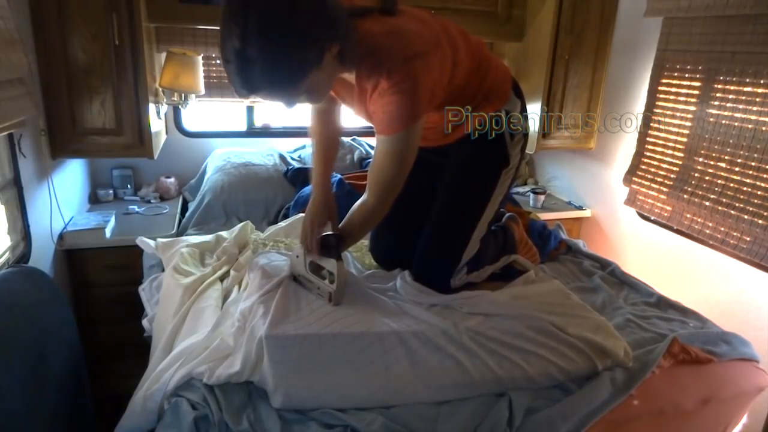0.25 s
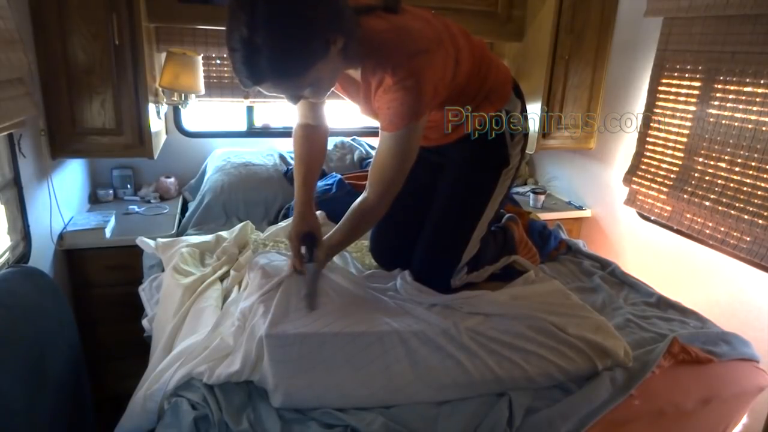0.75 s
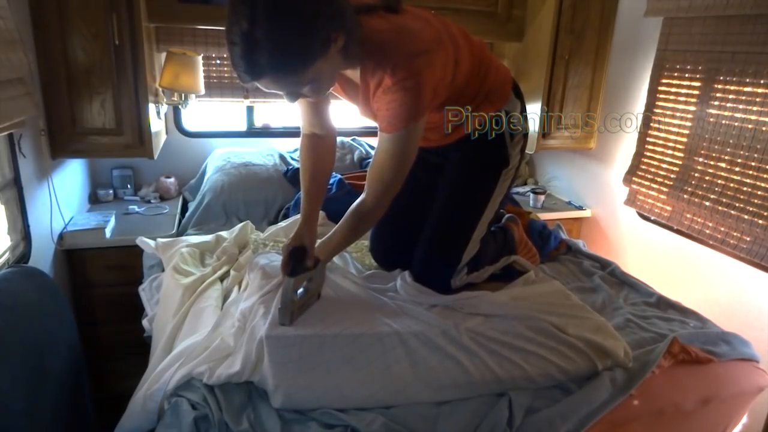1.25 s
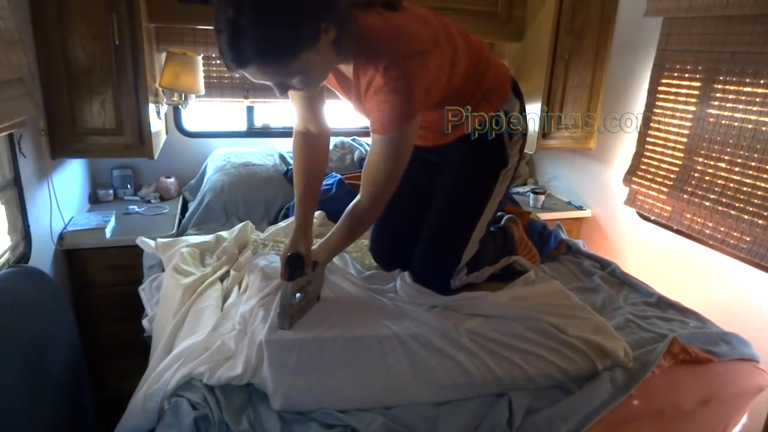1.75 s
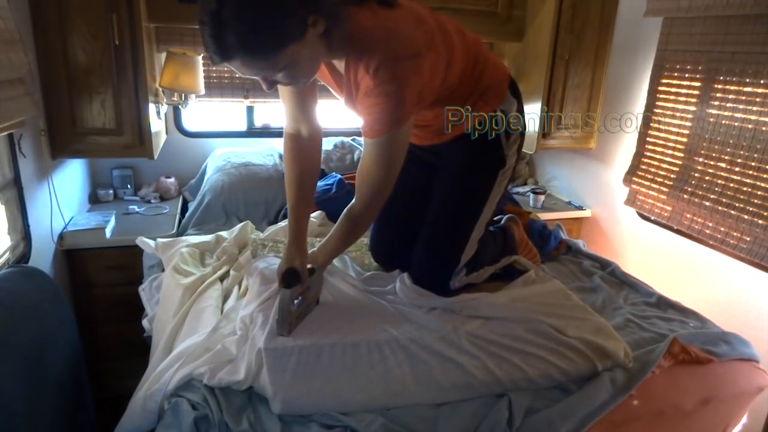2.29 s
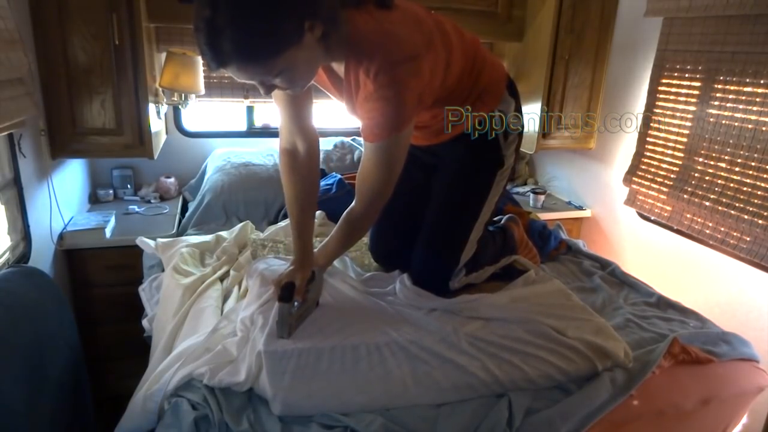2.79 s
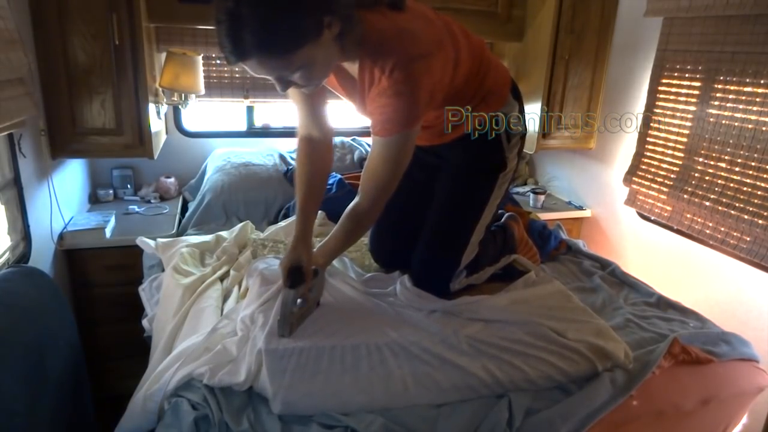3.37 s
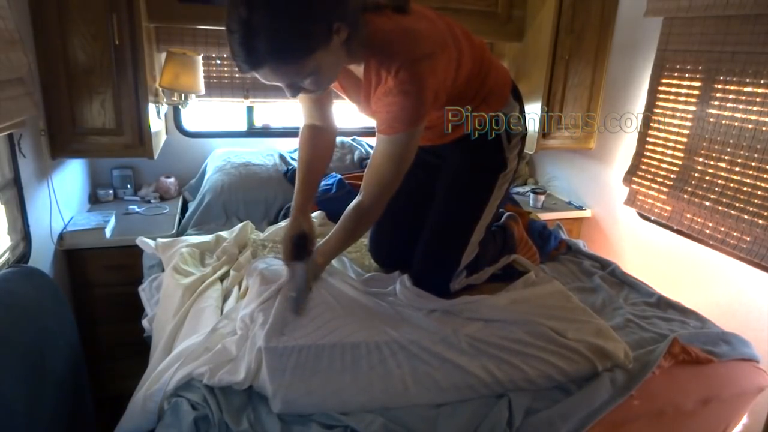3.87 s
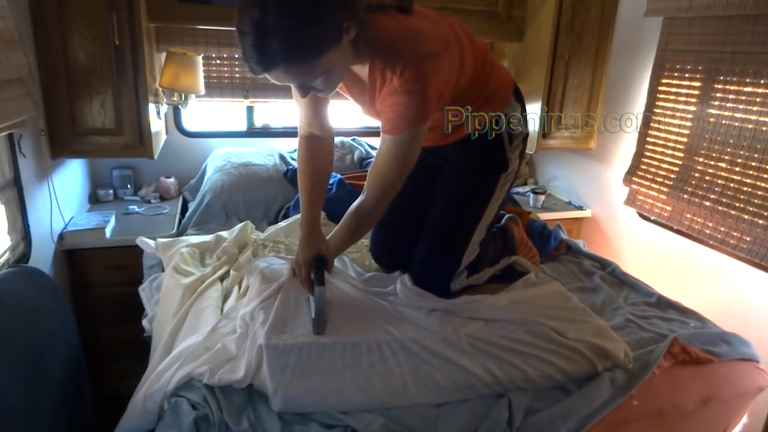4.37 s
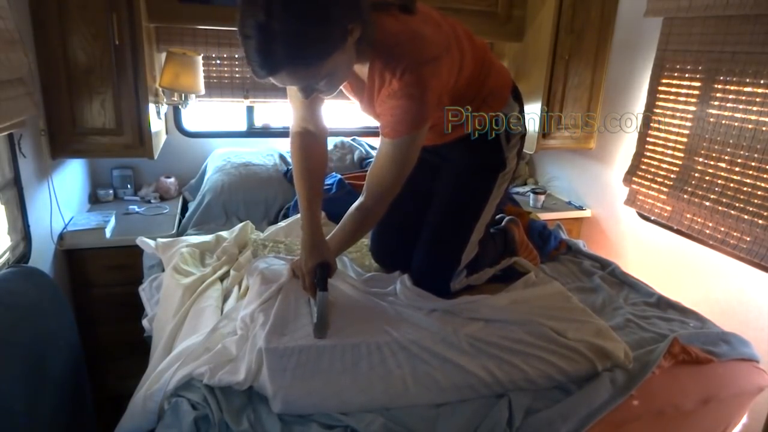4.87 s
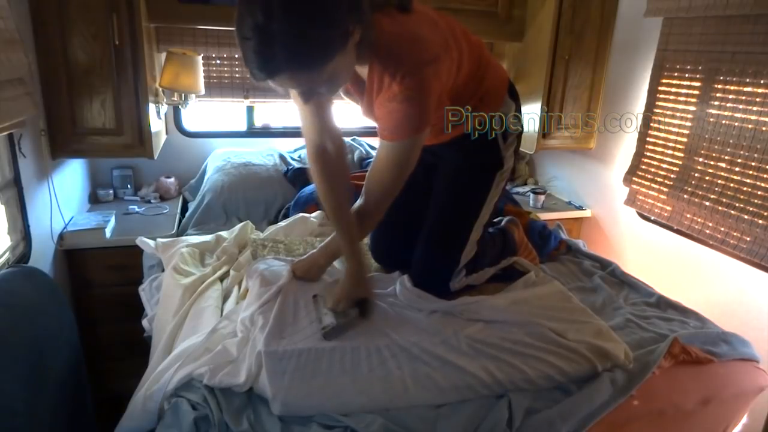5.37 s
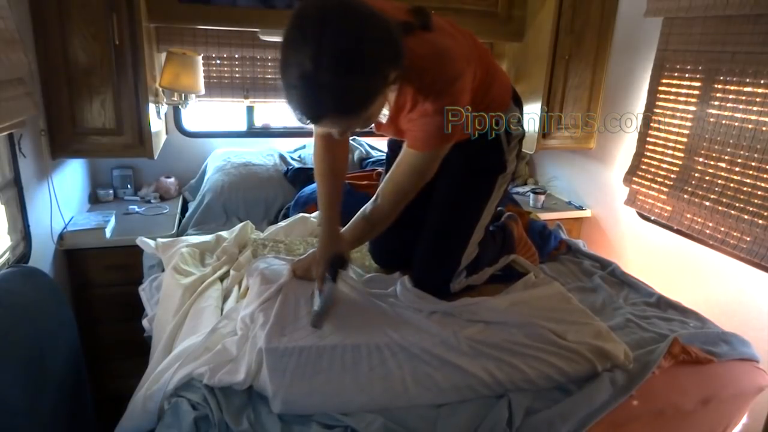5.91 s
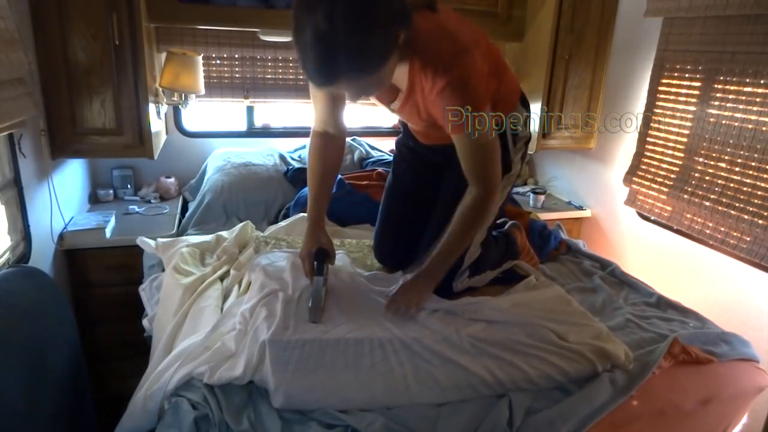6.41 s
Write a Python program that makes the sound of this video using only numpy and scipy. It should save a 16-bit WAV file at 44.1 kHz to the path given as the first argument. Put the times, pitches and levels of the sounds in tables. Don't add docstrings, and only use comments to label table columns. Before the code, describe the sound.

A steady low air-conditioner drone with rushing air fills a small, dry cabin. Faint handling ticks come first, then a metallic lever click and a hard staple-gun shot with a dull wooden boom. A cluster of lever snaps follows, then a pause, more snaps and a second hollow shot that bounces. It ends with clicks and light fabric rustles, heard from a few steps away in stereo.

```python
import sys
import numpy as np
from scipy import signal
from scipy.fft import rfft, irfft, next_fast_len
from scipy.io import wavfile
from scipy.ndimage import uniform_filter1d, minimum_filter1d, map_coordinates

SR = 44100
rng = np.random.default_rng(int(sys.argv[2]) if len(sys.argv) > 2 else 0)


def convert_level_to_amplitude(level_db):
    exponent = np.asarray(level_db, float) / 20
    return 10 ** exponent


def dump(signal):
    limited = np.clip(np.atleast_2d(signal).T, -1, 1)
    pcm = np.round(limited * 32767).astype(np.int16)
    wavfile.write(sys.argv[1], SR, pcm)


N = 293265


def unit(x):
    return x / np.sqrt(np.mean(x ** 2) + 1e-20)


def along(points, hz):
    f, v = np.transpose(points)
    return np.interp(np.log(hz + 1), np.log(f + 1), v)


def filtered(x, response):
    m = next_fast_len(x.shape[-1] + 4096)
    hz = np.fft.rfftfreq(m, 1 / SR)
    return irfft(rfft(x, m) * response(hz), m)[..., :x.shape[-1]]


def noise(n, spectrum):
    return unit(filtered(rng.standard_normal(n), lambda hz: convert_level_to_amplitude(along(spectrum, hz))))


def peak(f, hz, width):
    return 1j * f * width / (hz * hz - f * f + 1j * f * width)


def resonant(n, response):
    return unit(filtered(rng.standard_normal(n), response))


def wobble(rate):
    knots = rng.standard_normal(int(N * rate / SR) + 4)
    return map_coordinates(knots, [np.arange(N) * rate / SR])


def spread(n, spectrum, alike):
    pair = np.array([noise(n, spectrum), noise(n, spectrum)])

    def shares(hz):
        turn = np.arccos(np.clip(along(alike, hz), -1, 1)) / 2
        return np.array([np.cos(turn), np.sin(turn)])

    mid, side = filtered(pair, shares)
    return np.array([mid + side, mid - side])


def add(out, s, sound):
    part = out[:, round(s * SR):][:, :sound.shape[-1]]
    part += sound[..., :part.shape[1]]


def patchy(x, depth_db, from_hz):
    hz, _, z = signal.stft(x, SR, nperseg=512)
    field = uniform_filter1d(rng.standard_normal(z.shape[1:]), size=5, axis=0)
    field = unit(uniform_filter1d(field, size=4, axis=1))
    treble = 1 / (1 + (from_hz / (hz[:, None] + 1)) ** 4)
    return signal.istft(z * convert_level_to_amplitude(depth_db * field * treble), SR, nperseg=512)[1][:, :N]


COMPRESSOR_HZ, FAN_HZ, MAINS_HZ = 58.08, 23.5, 119.98
CYCLE_START_S = (3.352, 3.354, 3.352)
TONE_ORDERS = [(1, 0, 0), (2, 0, 0), (3, 0, 0), (4, 0, 0), (8, 0, 0), (12, 0, 0), (51, 0, 0), (57, 0, 0),
               (53, 0, 0), (58, 0, 0), (0, 0, 1), (0, 0, 3), (1, 0, 1), (2, 0, 1), (0, 1, 0), (0, 4, 0),
               (0, 5, 0), (0, 6, 0), (0, 11, 0), (0, 12, 0), (0, -1, 1), (0, 1, 1), (0, -1, 2)]
TONE_DB = [-22, -31, -35.5, -54, -48, -54, -58.5, -59.5, -74, -62.5, -24, -51, -55, -41.5, -65, -55, -70,
           -36.5, -45.5, -45, -62, -36, -67]
# frequency in Hz, density in dB per Hz.
DUCT_RUMBLE = [(20, -35), (40, -19), (55, -6.5), (75, -12.5), (110, -1), (160, -11), (250, -11.5),
               (400, -14.5), (590, -17.5), (800, -18.5), (1060, -20.5), (1250, -38), (1700, -52),
               (3000, -120)]
# frequency in Hz, density in dB per Hz.
VENT_HISS = [(710, -29.5), (1200, 1.5), (1390, -7.5), (1560, -1.5), (1900, -7), (2480, -9), (2900, -10),
             (3170, -9), (3330, -13.5), (4010, -18), (6810, -23.5), (8200, -27.5), (10900, -25.5),
             (12000, -26.5), (12500, -50), (16200, -80), (22000, -120)]
# frequency in Hz, left-right likeness from 0 to 1.
AIR_LIKENESS = [(60, 0.77), (130, 0.72), (280, 0.95), (590, 0.98), (1280, 0.96), (2740, 0.6), (5880, 0.91),
                (12600, 1.0)]
# frequency in Hz, left minus right in dB.
BASS_LEAN = [(60, -3), (110, -1), (200, -1.5), (360, 0.5), (650, 0)]


def air_conditioner():
    t = np.arange(N) / SR
    rates = (COMPRESSOR_HZ, FAN_HZ, MAINS_HZ)
    turns = np.array([hz * (t - start) for hz, start in zip(rates, CYCLE_START_S)])
    drone = np.zeros(N)
    for order, db in zip(TONE_ORDERS, TONE_DB):
        level = convert_level_to_amplitude(db + 0.48 * wobble(3.02))
        drone += level * np.sqrt(2) * np.cos(2 * np.pi * np.dot(order, turns))
    for hz, db in ((177.5, -44.5), (345.5, -47.5)):
        drone += convert_level_to_amplitude(db) * np.sqrt(2) * np.cos(2 * np.pi * hz * t)
    rumble = convert_level_to_amplitude(-27 + 0.59 * wobble(4.4)) * spread(N, DUCT_RUMBLE, AIR_LIKENESS)
    hiss = patchy(spread(N, VENT_HISS, AIR_LIKENESS), depth_db=3.0, from_hz=9400)
    hiss = convert_level_to_amplitude(-41.5 + 0.31 * wobble(2.82)) * hiss
    late_s = 0.000091

    def bearing(hz):
        bass = hz < 900
        lean = convert_level_to_amplitude(np.outer([.5, -.5], along(BASS_LEAN, hz) * bass))
        return lean * np.exp(np.outer([-1j, 1j], np.pi * late_s * hz * bass))

    return filtered(drone + rumble + hiss, bearing)


# start in seconds, peak
# in dB, pitch in Hz, t60 in seconds.
HOLLOW_KNOCKS = [(.478, -27.5, 1330, 0.085), (0.56, -22, 1320, 0.069), (2.5, -26, 1400, .04),
                 (2.712, -30, 1430, 0.27), (3.341, -28, 2400, 0.032), (3.535, -26, 1350, .08),
                 (2.713, -19, 650, 0.083), (5.323, -1, 440, 0.056), (5.322, -8, 1560, 0.043),
                 (5.357, -12, 213, .07), (5.286, -15.5, 3250, 0.03), (5.455, -21, 2550, 0.065),
                 (5.652, -33, 2000, 0.027)]


def knocks():
    out, t = np.zeros((2, N)), np.arange(SR // 8) / SR
    for s, db, hz, t60 in HOLLOW_KNOCKS:
        note = np.sin(2 * np.pi * hz * t)
        neighbour = .5 * np.sin(2 * np.pi * (1.06 * hz * t + rng.random()))
        envelope = convert_level_to_amplitude(db - 60 * t / t60) * (1 - np.exp(-t / 0.00072))
        add(out, s, envelope * (note + neighbour))
    return out


# frequency in Hz, left-right likeness from 0 to 1.
NEAR_LIKENESS = [(200, .9), (1000, .95), (3000, .9), (12000, .88)]
# frequency in Hz, t60 in seconds.
CABIN_T60 = [(200, 0.076), (1500, 0.08), (5000, 0.094), (12000, 0.073)]


def cabin(x, late_db=-22, late=5.8):
    hz, t, z = signal.stft(spread(SR // 3, [(20, 0), (20000, 0)], NEAR_LIKENESS), SR, nperseg=256)
    fall_db = -60 * t / along(CABIN_T60, hz)[:, None]
    decay = convert_level_to_amplitude(fall_db) + convert_level_to_amplitude(late_db + fall_db / late)
    tail = signal.istft(z * decay, SR, nperseg=256)[1]
    return signal.fftconvolve(x[None], tail / np.linalg.norm(tail[0]), axes=1)


# frequency in Hz, density in dB per Hz.
STEEL_BODY = [(710, -19), (1200, -12), (1530, -7), (1830, -2), (2710, -5.5), (4210, -3.5), (8200, -4.5),
              (10800, -3.5), (12000, 3.5), (12500, -3), (16200, -57), (22000, -120)]
# frequency in Hz, width in Hz, level in dB.
FRAME_MODES = [(3300, 240, -12), (5490, 330, -8), (6470, 130, -6.5), (7500, 350, 1.5), (9250, 260, -7.5),
               (10300, 260, -5), (10830, 480, -4)]


def clatter(n, grain_db):
    modes = [(hz, width, db + rng.normal(0, 3)) for hz, width, db in FRAME_MODES]

    def frame(f):
        return 1 + sum(convert_level_to_amplitude(db - 1.5) * np.abs(peak(f, hz, width)) ** 2 for hz, width, db in modes)

    grain = convert_level_to_amplitude(grain_db * unit(uniform_filter1d(rng.standard_normal(n), size=60)))
    return unit(filtered(spread(n, STEEL_BODY, NEAR_LIKENESS) * grain, frame))


# start in seconds, peak in dB, grip knock in dB, ring in Hz.
HANDLING_TICKS = [(0.487, -34, 2, 9600), (0.5596, -30.5, 9, 6900), (1.479, -34, -5, 4400),
                  (1.865, -36, -6, 9030), (2.105, -37, 0, 4030), (4.653, -37, 0, 5180),
                  (5.597, -36, -10, 7800), (5.7518, -25.5, -14, 8900), (6.12, -36, 7, 4010),
                  (6.168, -35, -10, 6000), (6.1958, -32, -14, 8260)]
# start in seconds, peak in dB, grip knock in dB, ring in Hz, cabin share in dB.
LEVER_SNAPS = [(2.417, -6, -12, 5970, -6.5), (2.708, -5.5, -29, 7500, -3), (3.3387, -10, -5, 10500, -3.5),
               (3.4258, -6.5, -8.5, 7400, -6), (3.472, -17, -10, 10600, -3.5), (3.529, -5, -27, 5540, -5),
               (5.199, -8, -16, 9900, -1), (5.2845, -10, -15, 10700, -3), (5.4515, -5.5, -14, 10500, -3.5),
               (5.6491, -8, -21, 7200, -6)]
# start in seconds, peak in dB.
LEVER_CREEPS = [(2.397, -29), (2.7014, -24), (3.33, -26), (3.4165, -27), (5.277, -23), (5.639, -21),
                (3.497, -30)]
# frequency in Hz, density in dB per Hz.
GRIP = [(900, -2), (1400, 6.5), (2600, 1), (3600, -7), (5000, -33)]


def handle():
    out, t = np.zeros((2, N)), np.arange(SR // 16) / SR
    faint_room_db = -3.5
    slips = [*LEVER_SNAPS]
    slips += [(*row, faint_room_db) for row in HANDLING_TICKS]
    slips += [(s, db, -12, 10800, faint_room_db) for s, db in LEVER_CREEPS]
    rattle = (1 - np.exp(-t / 0.00117)) / (1 + (t / 0.0069) ** 8) * convert_level_to_amplitude(-150 * t)
    impulse = 1. * (np.arange(256) == 128)
    for s, db, knock_db, ring_hz, room_db in slips:
        steel = clatter(len(t), grain_db=1.5) * rattle
        ring = resonant(len(t), lambda f: peak(f, ring_hz, 650)) * rattle
        grip = noise(len(t), GRIP) * rattle
        add(out, s, convert_level_to_amplitude(db - 10) * (steel + convert_level_to_amplitude(-5.0) * ring + convert_level_to_amplitude(knock_db) * grip))

        def colour(f):
            struck = convert_level_to_amplitude(along(STEEL_BODY, f)) * (1 + convert_level_to_amplitude(-2) * np.abs(peak(f, ring_hz, 900)) ** 2)
            return struck + convert_level_to_amplitude(knock_db - 3.5 + along(GRIP, f))

        crack = filtered(impulse, colour)
        echo = cabin(crack / np.linalg.norm(crack), late_db=-27)
        add(out, s + .001, convert_level_to_amplitude(db + room_db + 18) * echo)
    return out


# full contact in seconds, level in dB, hold in seconds, fade in dB per second.
HAND_STROKES = [(.654, -49, 0.042, 400), (6.118, -41.5, .008, 200), (6.16, -44, 0.027, 60),
                (6.186, -40.5, .02, 190), (6.553, -53, .1, 100)]
# frequency in Hz, density in dB per Hz.
FABRIC_WEAVE = [(880, -32), (1500, -6), (3190, -6), (4240, -7.5), (11100, -9.5), (12100, -5), (12500, -51),
                (16200, -81), (22000, -120)]


def cloth():
    t = np.arange(N) / SR
    power = np.zeros(N)
    for s, db, hold, fade in HAND_STROKES:
        approach_db = 420 * np.maximum(s - t, 0)
        fade_db = fade * np.maximum(t - s - hold, 0)
        power += convert_level_to_amplitude(db - approach_db - fade_db) ** 2
    grain = convert_level_to_amplitude(1.6 * wobble(147) + 1.5 * wobble(40))
    return np.sqrt(power) * grain * spread(N, FABRIC_WEAVE, NEAR_LIKENESS)


# start in seconds, steel in dB, board in dB, magazine clack in dB, low thud in dB.
BLOWS = [
    (2.709, -38, -17, -37, -35),
    (2.790, 6, -2, -7, 0),
    (2.811, -13, -11, -18, -12),
    (5.305, 7.5, -7, -3, -7),
    (5.322, -5, 1.5, -2, -6),
    (5.357, -16, -15, -23, -7),
]
# frequency in Hz, width in Hz, level in dB.
BOARD_MODES = [(469, 136, -1.5), (635, 144, 1), (866, 320, -8), (1115, 120, -9.5)]


def driver():
    out, t = np.zeros((2, N)), np.arange(SR // 4) / SR

    def wood(f):
        return sum((-1) ** k * convert_level_to_amplitude(db) * peak(f, hz, width) for k, (hz, width, db) in enumerate(BOARD_MODES))

    for s, steel_db, board_db, clack_db, thud_db in BLOWS:
        t60_s = .1 if steel_db > 0 else .077
        fall = convert_level_to_amplitude(-60 * t / t60_s) * (1 - np.exp(-t / 0.001))
        board = resonant(len(t), wood) * (1 - np.exp(-t / 0.0013))
        clack = resonant(len(t), lambda f: peak(f, 1527, 330) ** 2)
        thud = resonant(len(t), lambda f: peak(f, 287, 250) ** 2) * (1 - np.exp(-t / 0.0046))
        body = (convert_level_to_amplitude(board_db) * board + convert_level_to_amplitude(clack_db) * clack + convert_level_to_amplitude(thud_db) * thud) * fall
        steel = convert_level_to_amplitude(steel_db) * clatter(len(t), grain_db=2.5) * fall
        add(out, s, steel + body)
        add(out, s + .002, convert_level_to_amplitude(-11.5) * cabin(steel[0] + body, late_db=-22))
    return out


def scene():
    return air_conditioner() + knocks() + handle() + cloth() + driver()


def limiter(x):
    hold_s, smooth_s = .004, .002
    level = np.sqrt(np.abs(uniform_filter1d(np.mean(x ** 2, 0), size=SR // 500)))
    need = np.minimum(1, .42 / (1.805 * level + 1e-9))
    held = minimum_filter1d(need, size=max(3, round(hold_s * SR)), origin=0)
    return x * convert_level_to_amplitude(uniform_filter1d(20 * np.log10(held), size=max(3, round(smooth_s * SR))))


# frequency in Hz, share lost from 0 to 1.
FAINT_LOSS = [(4000, 0), (6000, .06), (7200, .14), (8400, .33), (9600, .18), (11000, .07), (11800, .2),
              (12030, .5), (12050, 1)]


def thrift(x, faint_db, side_db, side_hz):
    hz, _, z = signal.stft([x[0] + x[1], x[0] - x[1]], SR, nperseg=2048)
    band = np.arange(len(hz)) // 10
    power = np.add.reduceat(np.abs(z) ** 2, np.arange(0, len(hz), 10), axis=1)
    luck = rng.random(power.shape)[:, band]
    level_db = 10 * np.log10(power + 1e-20)[:, band]
    keep_mid = (luck[0] > along(FAINT_LOSS, hz)[:, None]) | (level_db[0] > faint_db)
    bass = hz[:, None] < side_hz * (.8 + .4 * luck[1, :1])
    loud = (level_db[1] > side_db) & (luck[1, band // 4 * 40] < .1)
    kept = [z[0] * keep_mid, z[1] * (bass | loud)]
    mid, side = signal.istft(kept, SR, nperseg=2048)[1][:, :N]
    return np.array([mid + side, mid - side]) / 2


def low_pass(x):
    return signal.sosfilt(signal.butter(12, 13220, fs=SR, output="sos"), x)


def record(dry):
    x = thrift(limiter(dry), faint_db=-64, side_db=-50, side_hz=1600)
    mix = filtered(x, lambda hz: (hz > 12) / (1 + (hz / 11780) ** 60))
    return low_pass(mix)


dry = scene()
out = record(dry)
dump(out)
```